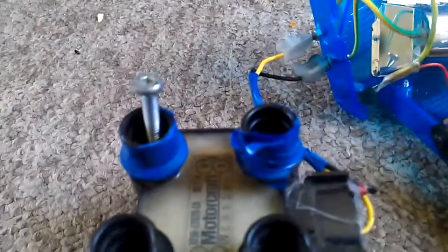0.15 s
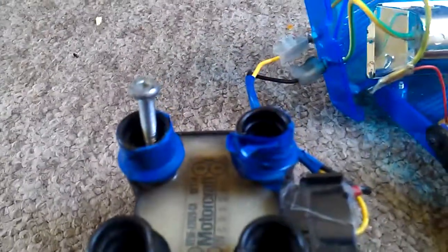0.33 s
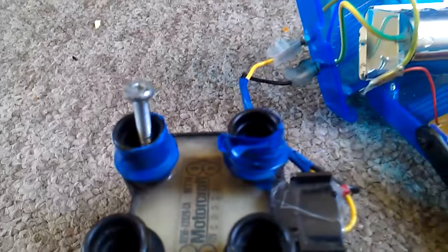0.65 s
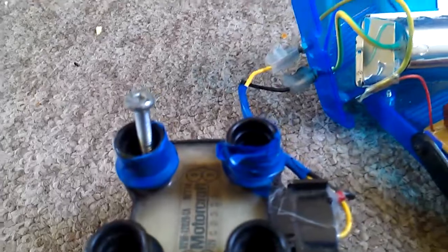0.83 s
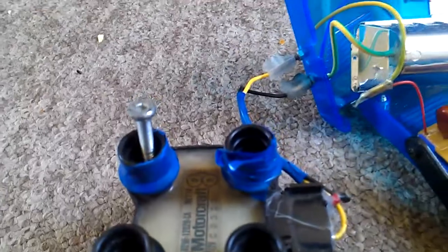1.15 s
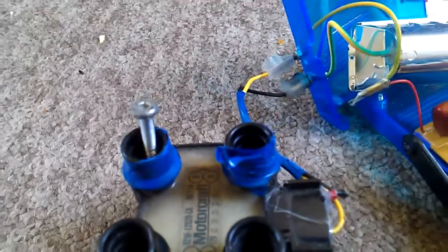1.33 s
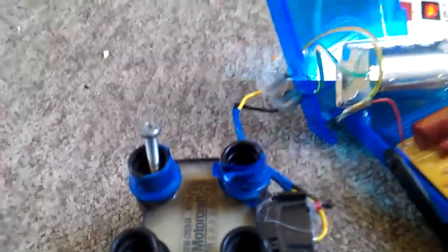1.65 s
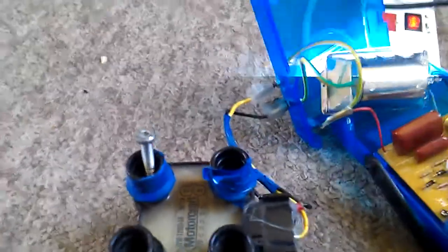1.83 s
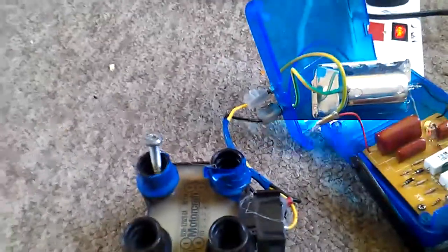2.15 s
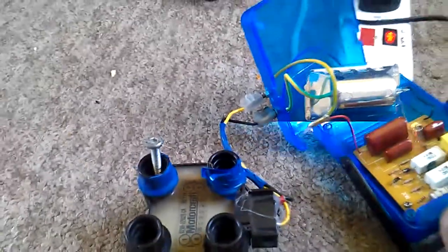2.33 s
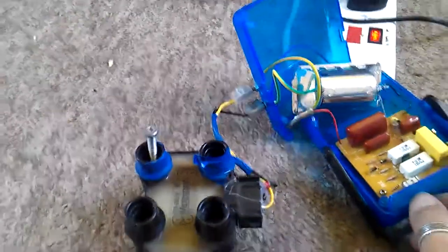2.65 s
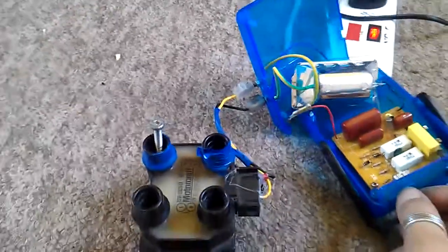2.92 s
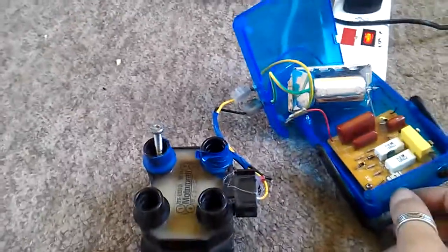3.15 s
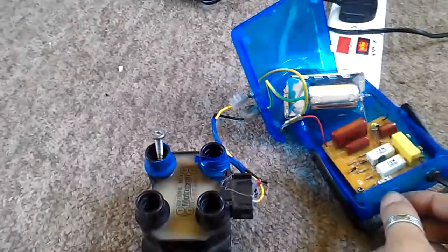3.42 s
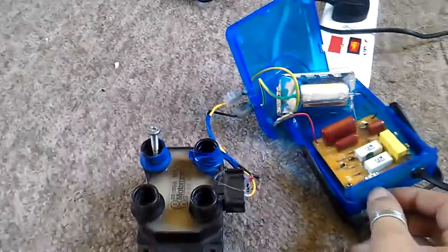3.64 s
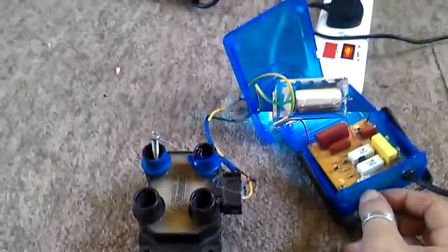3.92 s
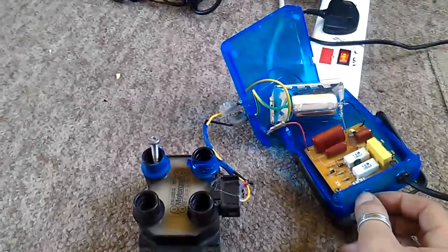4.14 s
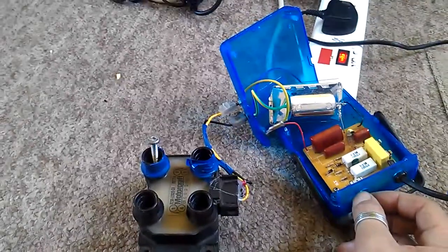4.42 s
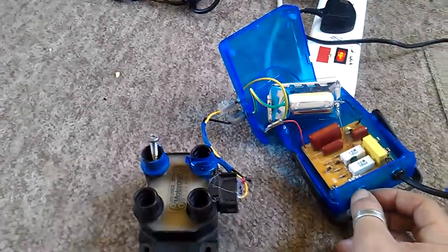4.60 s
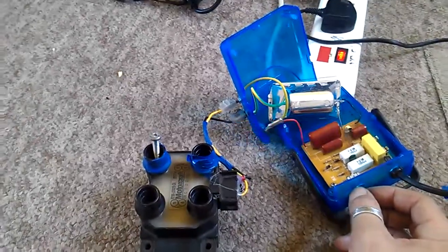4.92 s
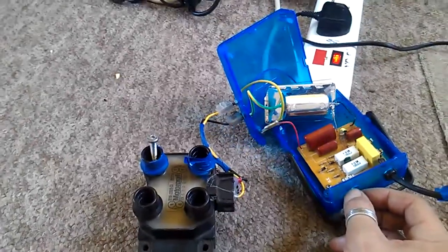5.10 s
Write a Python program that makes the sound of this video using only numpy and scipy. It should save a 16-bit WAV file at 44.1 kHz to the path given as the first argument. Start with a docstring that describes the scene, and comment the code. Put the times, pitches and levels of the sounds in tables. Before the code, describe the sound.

Rapid, even electric snapping runs from start to finish without pause, recorded close in stereo on a phone. The clicks are loud, piercing and distorted, with quick wall reflections and short room decay filling the gaps. The phone shifts closer, pulls back, then eases in, subtly changing the tone. Underneath sit thin hiss, a weak narrow mid-high whine, and a couple of dull hand bumps.

```python
"""On the floor of a furnished room, a strobe circuit fires an ignition coil five and a half times a second.
Each spark is a sharp click: it rings the phone's two microphone ports into overload, bounces off the walls
and dies away in the room as fading noise. The phone drifts nearer, is pulled back, then eases in again.
The circuit whines faintly (narrow noise), the hand knocks the phone softly (fading sines), and steady
room noise and hiss lie beneath."""
import sys
import numpy as np
from scipy import signal
from scipy.io import wavfile

SR = 44100
rng = np.random.default_rng(int(sys.argv[2]) if len(sys.argv) > 2 else 0)


def master_out(mix):
    """Clip the mix to full scale and print it as 16-bit PCM to the path in sys.argv[1]."""
    frames = np.transpose(np.atleast_2d(mix))
    ceiling = np.clip(frames, -1, 1)
    pcm = np.round(ceiling * 32767).astype(np.int16)
    wavfile.write(sys.argv[1], SR, pcm)


N = 232183   # length in samples

FIRST_SPARK_S, SPARK_EVERY_S, SPARK_COUNT = 0.0247, 0.18, 29
PORT_HZ, PORT_WIDTH_HZ = 3883, 246   # the microphone ports ring here


def snaps():
    """Each spark and its wall echoes strike all the modes; neighbouring modes swing in opposite sense."""
    # what a snap rings with: f/Hz, t60/s, left level/dB, right level/dB,
    # change when fully pulled back: left/dB, right/dB
    modes = [(107, 0.0067, -34, -49, 25, -5), (256, 0.016, -26, -24, 14, 12.5),
             (771, 0.021, -21, -20, 10.5, 7.5), (1282, 0.0095, 8.5, -3.5, -6, -15.5),
             (1624, 0.0057, 14.5, -3.5, 1.5, 3.5), (2077, 0.0061, 13.5, -3.5, 3.5, -1),
             (2883, 0.0047, -6, 11.5, 4.5, -2.7), (3607, 0.0082, 6.5, 3, -1, 9),
             (3879, 0.0097, 4.5, 14, 1.5, -10), (4456, 0.0084, 9, 2.5, -17.5, -8.5),
             (6073, 0.0032, 21, 11, -9.5, -5), (7450, 0.0018, 15, 12.5, -2.5, -3),
             (9240, 0.0015, 5, 8.5, 10, 0), (12200, 0.001, -24, -3, 10, 24),
             (12370, 0.0043, 21.5, -19.5, -38, -12.5)]
    # wall echoes, against the direct click: delay/s, left level/dB, right level/dB,
    # change when fully pulled back/dB
    echoes = [(.0078, -54, -50, 2), (0.012, -39, -46, 9), (.0135, -31.5, -36, 14), (0.017, -33, -58, -5),
              (.0280, -50, -29, 9.5), (0.041, -52, -31, -19)]
    spread_db = 1.69   # how much a mode's level varies from spark to spark
    # low modes come round the parts and arrive late; the port ring builds up at its own delay (left, right)
    lows_below_hz, lows_late_s = 4200, [0.0005727, 0.00021]
    port_ring_late_s = [0.001514, 0.0004138]

    sparks = spark_times()
    back, _ = phone_at(sparks)
    spread = spread_db * rng.standard_normal((len(sparks), len(modes), 2))
    port_mode = np.argmin(np.abs(np.array(modes)[:, 0] - PORT_HZ))
    direct, walls = np.zeros((2, 2, N))
    for k, (hz, t60, *heard_db) in enumerate(modes):
        late_s = [0, 0]
        if k == port_mode:
            late_s = port_ring_late_s
        elif hz < lows_below_hz:
            late_s = lows_late_s
        clicks = np.zeros((2, 2, N))   # direct and walls; left and right
        for ear in range(2):
            level_db = heard_db[ear] + heard_db[2 + ear] * back + spread[:, k, ear]
            arrival = sparks + late_s[ear]
            add_clicks(clicks[0, ear], arrival, amp(level_db))
            for delay, *wall_db, wall_change_db in echoes:
                echo_db = level_db + wall_db[ear] + wall_change_db * back
                add_clicks(clicks[1, ear], arrival + delay, amp(echo_db))
        rung = (-1) ** k * ring(clicks, hz, t60)
        direct += rung[0]
        walls += rung[1]
    return direct + furnished_walls(walls)


def furnished_walls(echoes):
    """A furnished wall breaks each echo into a short burst and sends back mostly the middle of the range."""
    smear_t60_s, low_hz, high_hz = 0.009, 1500, 7000
    t = np.arange(SR // 100) / SR
    burst = rng.standard_normal((2, len(t))) * amp(-60 * t / smear_t60_s)
    burst /= np.linalg.norm(burst, axis=1, keepdims=True)
    smeared = signal.fftconvolve(echoes, burst, axes=1)[:, :N]
    wall_band = signal.butter(2, [low_hz, high_hz], "band", fs=SR, output="sos")
    return signal.sosfilt(wall_band, smeared)


def room():
    """Reverberation: noise that dies band by band after each spark, its pattern changing only a little."""
    # reverberation before the ports: f/Hz, left level/dB, right level/dB, t60/s,
    # change when fully pulled back/dB
    decay = [(100, -33.5, -47, 0.088, -17), (208, -29, -28.5, 0.35, -5), (410, -24.5, -24.5, 0.46, -9),
             (796, -22, -20.5, 0.38, 1), (1357, -5.5, -7, 0.27, 2.7), (1760, 1, -1.5, 0.35, -6),
             (2330, 4.5, 2, 0.22, 1.5), (2770, -6, -4.5, 0.34, 7), (4350, 1.5, -3.5, 0.27, -1.5),
             (6140, 1.5, 1.5, 0.32, -2), (7800, -1, -17, 0.16, -1.5), (9600, -25, -28.5, 0.53, 2.5),
             (11970, 9, 7.5, 0.14, -10.5), (14100, -18, -16.5, 0.19, -12)]
    memory = 0.89   # likeness of the room's answer from one spark to the next
    earlier_loss_db = -4   # for the one spark before the start, of which only the tail is heard
    build_up_s = 0.0072   # time constant of the swell
    # dense bounces off the small parts lying round the coil; level is on top of each band's own
    scatter_db, scatter_t60_s, scatter_low_hz = 19, 0.022, 1680
    port_db = [9.5, 20]   # how strongly the port resonance is added, left and right
    dip_hz, dip_width_hz, dip_share = 9000, 1600, 0.99   # the ports are nearly deaf to the room here

    sparks = np.r_[FIRST_SPARK_S - SPARK_EVERY_S, spark_times()]
    length = SR // 3
    back, room_db = phone_at(sparks)
    room_db = room_db + earlier_loss_db * (sparks < 0)
    white = rng.standard_normal((len(sparks), 2, 2, length))
    for k in range(1, len(sparks)):
        white[k] = memory * white[k - 1] + np.sqrt(1 - memory ** 2) * white[k]

    t, tails = np.arange(length) / SR, 0
    scatter = amp(scatter_db - 60 * t / scatter_t60_s)
    for hz, pair in stereo_bands(np.moveaxis(white, 0, 2)):
        left_db, right_db, t60, change_db = at_hz(decay, hz)
        reverb = (1 - np.exp(-t / build_up_s)) * amp(-60 * t / t60)
        small_parts = 1 / (1 + (scatter_low_hz / hz) ** 2)   # long waves pass round small things
        gain = amp(np.c_[[left_db, right_db]] + change_db * back)[..., None]
        tails = tails + gain * pair * (reverb + small_parts * scatter)

    out = np.zeros((2, N + 2 * length))   # spare space at both ends
    for k, (s, level_db) in enumerate(zip(sparks, room_db)):
        start = length + round(s * SR)
        out[:, start:start + length] += amp(level_db) * tails[:, k]
    out += amp(np.c_[port_db]) * resonance(out, PORT_HZ, PORT_WIDTH_HZ)
    out -= dip_share * resonance(out, dip_hz, dip_width_hz)
    return out[:, length:length + N]


def spark_times():
    """A steady beat that slips late by fits and starts."""
    # how late the beat runs: t/s, delay/s
    slip = [(0, 0), (1.3, .0002), (1.47, .0008), (2.1, .0004), (2.7, .0012), (3.9, .0016), (4.35, .0019),
            (4.53, .0027), (4.89, .003), (5.07, .004)]
    beat = FIRST_SPARK_S + SPARK_EVERY_S * np.arange(SPARK_COUNT)
    return beat + np.interp(beat, *np.transpose(slip))


def phone_at(s):
    """How far the phone is pulled back at times s, and how loud it hears the room, in dB."""
    # the phone's path: t/s, pulled back (0 to 1), reverberation level/dB
    path = [(0, 0.45, -28), (1.4, 0.25, -27.5), (1.9, 0.11, -28.5), (2.4, 0.55, -27.5), (3.0, 0.7, -26.5),
            (4.0, 0.66, -27), (5.26, 0.5, -27)]
    times, back, room_db = np.transpose(path)
    return np.interp(s, times, back), np.interp(s, times, room_db)


def whine():
    """The circuit's faint wavering tone: noise passed twice through a narrow resonance."""
    # loudness of the whine: t/s, level/dB
    loudness = [(0, -66), (.45, -56), (.9, -57), (1.5, -59), (2.1, -85), (2.3, -57), (2.6, -57), (2.9, -63),
                (4.0, -79), (4.3, -59), (4.7, -75), (5.26, -78)]
    hz, width_hz = 1393, 20   # width of each pass
    tone = resonance(rng.standard_normal(N), hz, width_hz)
    tone = resonance(tone, hz, width_hz)
    level_db = np.interp(np.arange(N) / SR, *np.transpose(loudness))
    return amp(level_db) * tone / np.std(tone)


def knocks():
    """The hand shifts on the phone: each soft low knock swells briefly and rings on one dull mode."""
    # knocks: t/s, f/Hz, level before the swell holds it down/dB, t60/s
    hand = [(1.035, 355, -35, 0.057), (1.404, 154, -47, .16)]
    rise_s = 0.017   # time constant of the swell
    t, out = np.arange(N) / SR, 0
    for s, hz, level_db, t60 in hand:
        since = np.maximum(t - s, 0)
        swell = 1 - np.exp(-since / rise_s)
        fade = amp(level_db - 60 * since / t60)
        out = out + swell * fade * np.sin(2 * np.pi * hz * since)
    return out


def air():
    """Steady room noise and microphone hiss, built from noise bands and lifted where the ports ring."""
    # noise in each band before the port lift: f/Hz, level/dB
    hiss = [(30, -69.5), (100, -84.5), (300, -75.5), (800, -71.5), (2000, -55.5), (3900, -56), (5500, -57),
            (7500, -92), (9500, -94), (14000, -87)]
    port_db = [1, 10]   # how strongly the port resonance is added, left and right
    noise = 0
    for hz, pair in stereo_bands(rng.standard_normal((2, 2, N))):
        noise = noise + amp(at_hz(hiss, hz)[0]) * pair
    return noise + amp(np.c_[port_db]) * resonance(noise, PORT_HZ, PORT_WIDTH_HZ)


def stereo_bands(white):
    """Yields each band's centre in Hz and a left-right pair of rms 1; white is (2 draws, mid-side, .., time)."""
    # how alike left and right are: f/Hz, likeness (0 to 1)
    likeness = [(60, 0.77), (600, 0.69), (1300, 0.2), (14000, 0.17)]
    edges = 25 * 2 ** np.arange(0, 9.5, 0.4)   # Hz
    for k, (low, high) in enumerate(zip(edges, edges[1:])):
        band = signal.butter(2, [low, high], "band", fs=SR, output="sos")
        mid, side = signal.sosfilt(band, white[k % 2])   # neighbouring bands use different draws
        hz = np.sqrt(low * high)
        alike = at_hz(likeness, hz)[0]
        shared, apart = np.sqrt(1 + alike) * mid, np.sqrt(1 - alike) * side
        pair = np.array([shared + apart, shared - apart])
        yield hz, pair / np.std(pair)


def amp(db):
    """Turns dB into gain."""
    return 10 ** (np.asarray(db) / 20)


def at_hz(rows, hz):
    """Reads every column of a table at one frequency, sliding evenly in pitch between rows."""
    f, *columns = np.transpose(rows)
    return np.array([np.interp(np.log(hz), np.log(f), c) for c in columns])


def resonance(x, hz, width_hz):
    """A two-pole resonance with gain 1 at its top."""
    r = np.exp(-np.pi * width_hz / SR)
    top = np.array([1, 0, -1]) * (1 - r * r) / 2
    return signal.lfilter(top, [1, -2 * r * np.cos(2 * np.pi * hz / SR), r * r], x)


def ring(clicks, hz, t60):
    """A unit click sets a dying sine of starting height 1 ringing."""
    r, w = amp(-60 / (t60 * SR)), 2 * np.pi * hz / SR
    # the tiny offset keeps the filter from slowing down on near-zero numbers
    return signal.lfilter([0, np.sin(w)], [1, -2 * r * np.cos(w), r * r], clicks + 1e-18)


def add_clicks(track, s, heights):
    """Adds clicks at times s, each shared between the two nearest samples."""
    at = np.floor(s * SR).astype(int)
    share = s * SR - at
    track[at] += heights * (1 - share)
    track[at + 1] += heights * share


def widen(x):
    """Stereo widening: the left-right difference returns a moment later, opposite in the two channels."""
    delay_s, level_db, low_hz = 0.00462, -10.5, 684
    high_pass = signal.butter(1, low_hz, "high", fs=SR, output="sos")
    side = signal.sosfilt(high_pass, (x[0] - x[1]) / 2)
    later = np.pad(side, (round(delay_s * SR), 0))[:N]
    return x + amp(level_db) * later * [[1], [-1]]


def scene():
    """Snaps, their reverberation, the whine, the hand's knocks and the steady noise."""
    return snaps() + room() + whine() + knocks() + air()


def record(dry):
    """Widens the image, flattens overloaded peaks, drains the offset and cuts the top."""
    clip_top, clip_hardness = 1, 8.4   # a higher hardness bends later and more sharply
    block_hz, cutoff_hz = 26.1, 14200
    wide = widen(dry)
    flat = wide / (1 + np.abs(wide / clip_top) ** clip_hardness) ** (1 / clip_hardness)
    blocked = signal.sosfilt(signal.butter(1, block_hz, "high", fs=SR, output="sos"), flat)
    top_cut = signal.ellip(8, 0.2, 40, cutoff_hz, fs=SR, output="sos")
    return signal.sosfiltfilt(top_cut, blocked)


dry = scene()
out = record(dry)
master_out(out)
```